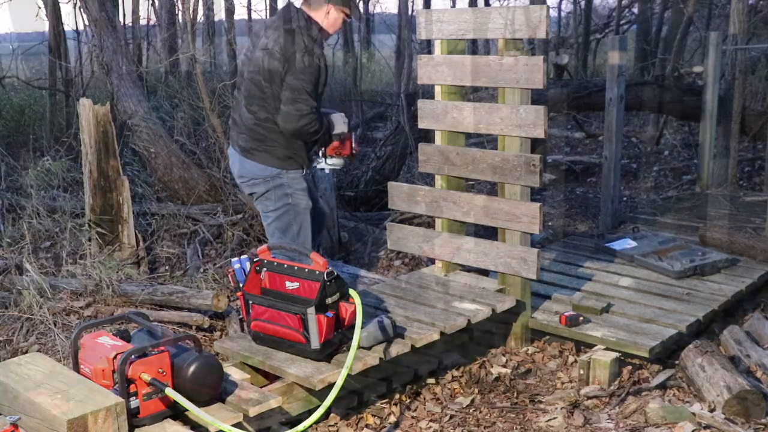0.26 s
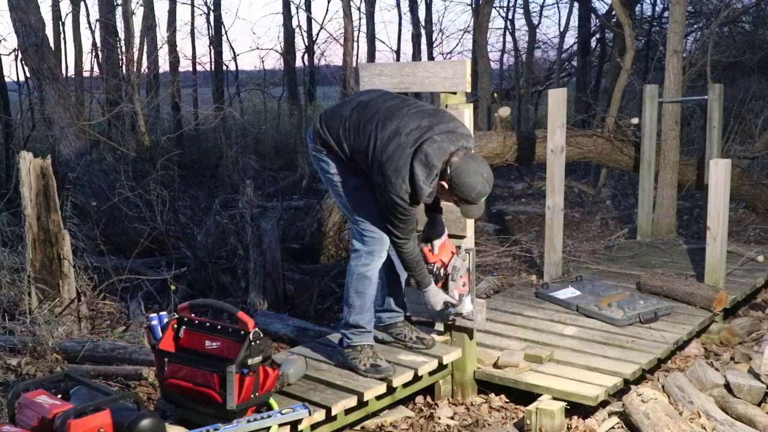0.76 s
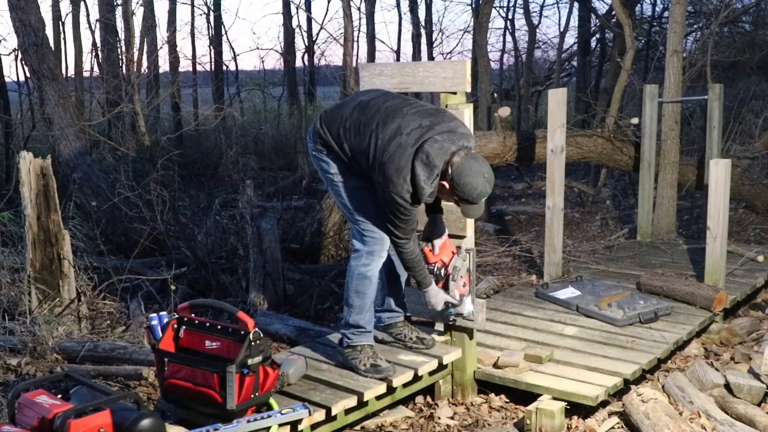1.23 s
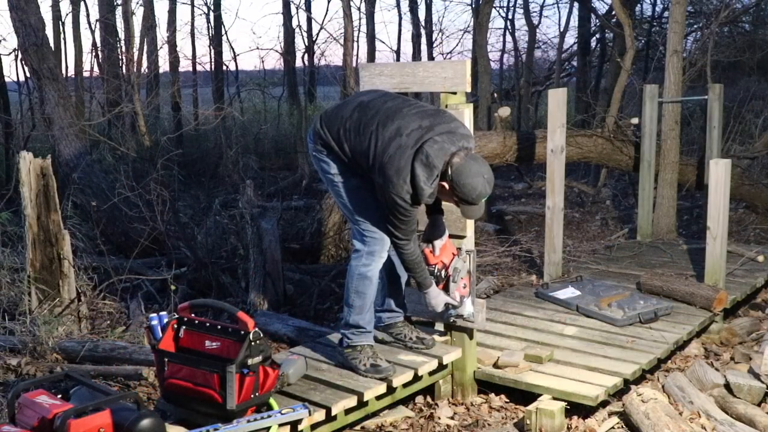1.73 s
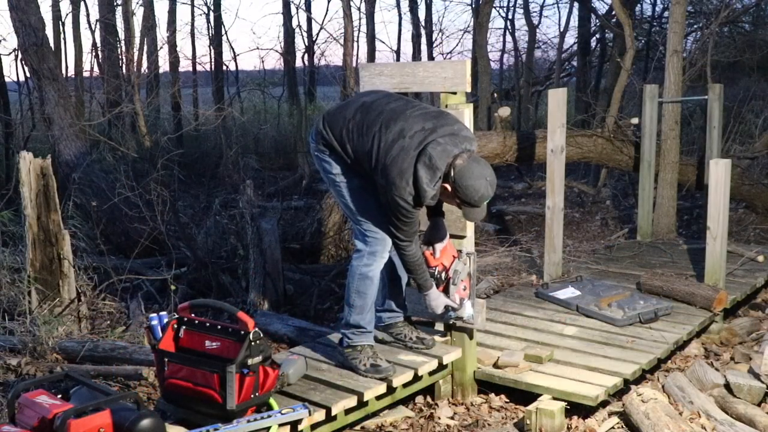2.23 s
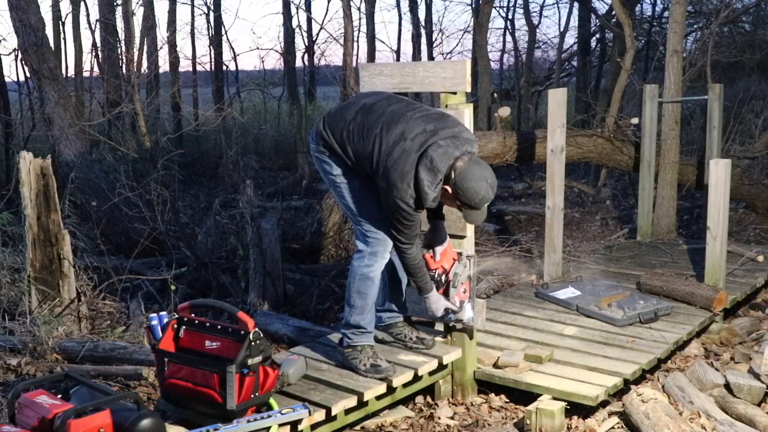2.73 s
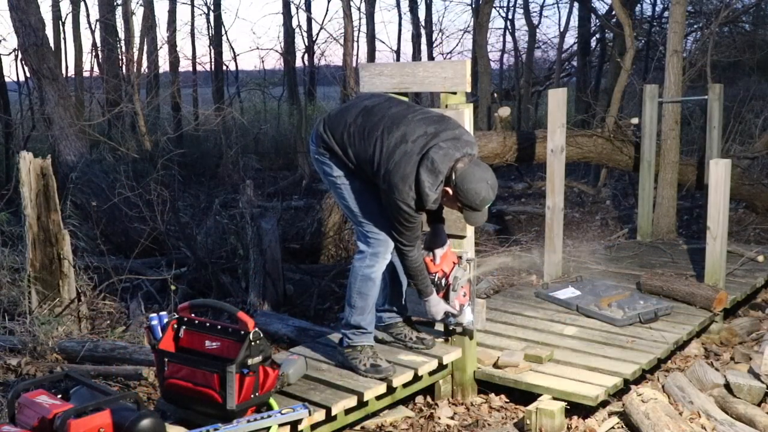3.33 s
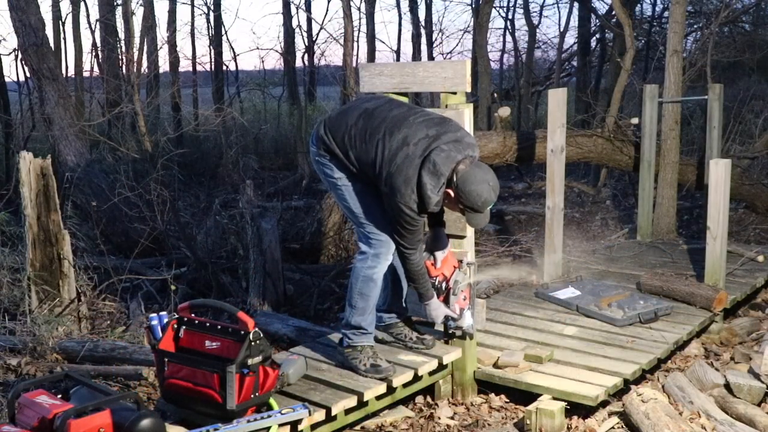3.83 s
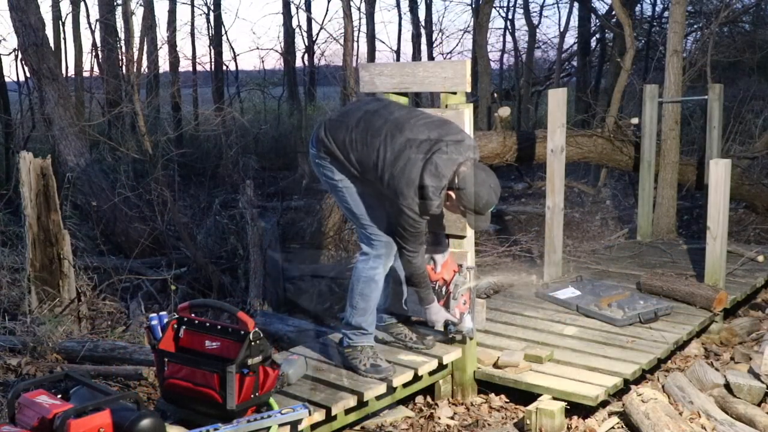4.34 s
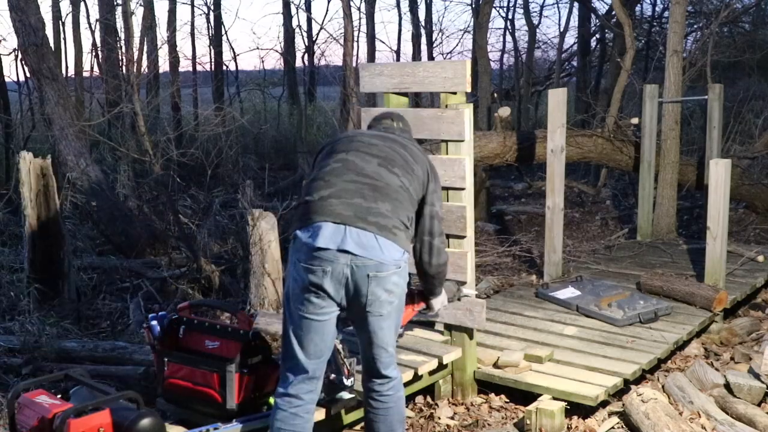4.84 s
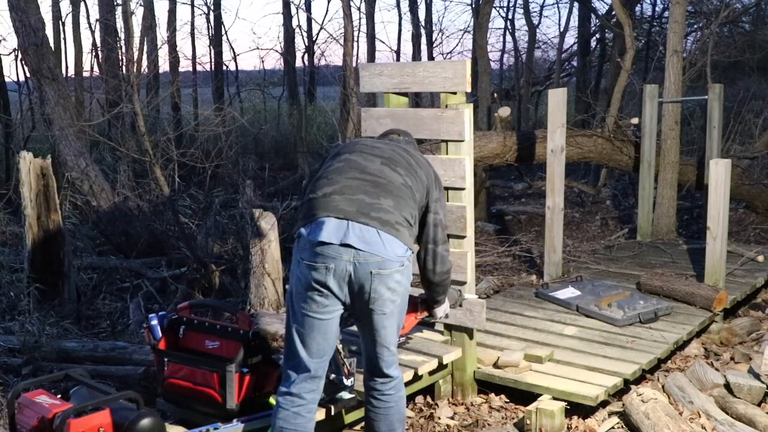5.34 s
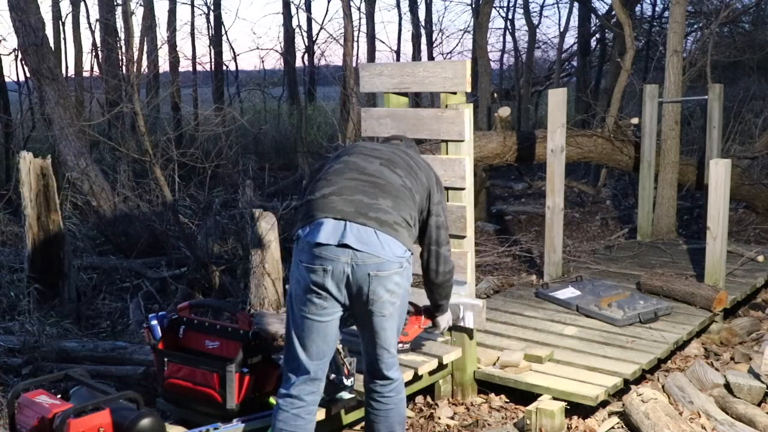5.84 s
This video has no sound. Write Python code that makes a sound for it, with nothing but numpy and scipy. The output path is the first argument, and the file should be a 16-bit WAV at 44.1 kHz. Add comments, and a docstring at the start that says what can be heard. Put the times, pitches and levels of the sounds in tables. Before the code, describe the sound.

Outdoors among trees, nearly quiet at first: soft air and a very faint, glassy ring of a free steel blade, with a tiny tick at 0.2 s. From 0.3 to 0.8 s a circular saw fades in, a steady whine near 2.3 kHz over rushing fan air. At 1.7 s the teeth bite wood: bright, gritty rasp bursts in, squeals swell around 1.9-2.6 s, and the whine dims and sags slightly. Rasp surges with pushes until 4.4 s, the whine partly returning. By 4.7 s it has faded into stronger breeze and leaf rustle, with dry snaps and ticks. Wooden knocks come at 5.1 and 5.3 s, a faint rattle at 5.6. At 5.7 s a sharp crack starts a reciprocating saw: quick rising whine, chirp, clustered hollow blows; at 5.9 s the blade catches, shaking and chattering rapidly to the end. A short thin echo surrounds it.

```python
"""A free steel blade rings faintly outdoors, then a circular saw fades in, bites a board and slows under load.
The sound fades over to a breezier moment: a reciprocating saw knocks on wood, starts with a crack and chatters.
Circular saw: shaft-locked tones, fan noise and a tooth pattern that repeats every turn; squeals are swelling tones.
Reciprocating saw: rising gear whine, pulsed scrape and shake; its knocks are blows and rattles ringing the wood.
Breeze and leaves are shaped noise, snaps are one-cycle clicks; a thin echo follows the second saw and the snaps."""
import sys
import numpy as np
from scipy import signal
from scipy.fft import rfft, irfft
from scipy.io import wavfile
from scipy.ndimage import uniform_filter1d, map_coordinates

SR = 44100
rng = np.random.default_rng(int(sys.argv[2]) if len(sys.argv) > 2 else 0)


def output_pcm(signal):
    """Save a mono or channel-first signal as 16-bit PCM at the path in sys.argv[1].

    Samples are clipped to [-1, 1] before scaling.
    """
    pcm = np.clip(np.atleast_2d(signal).T, -1, 1) * 32767
    wavfile.write(sys.argv[1], SR, np.round(pcm).astype(np.int16))


N = 268657
T = np.arange(N) / SR
HZ = np.fft.rfftfreq(N, 1 / SR)

# circular saw
GEAR_TEETH, BLADE_TEETH = 25, 24
CONTACT_S = 1.7  # teeth meet the wood
RASP_RISE_S, CHIP_RISE_S, SINK_S = 0.12, 0.035, 0.18
# reciprocating saw: motor start, blade catches in the wood
TRIGGER_S, CATCH_S = 5.692, 5.916


def amp(db):
    """Decibels to gain."""
    return 10 ** (np.asarray(db) / 20)


def unit(x):
    """Scales to rms 1."""
    return x / np.sqrt(np.mean(x ** 2) + 1e-20)


def curves(rows):
    """Interpolates the columns of a (time [s], value...) table to every sample."""
    time_s, *columns = np.transpose(rows)
    return [np.interp(T, time_s, column) for column in columns]


def ramp(start_s, length_s):
    """Linear rise from 0 to 1, then held."""
    return np.clip((T - start_s) / length_s, 0, 1)


def swell(peak_s, length_s):
    """Cosine-squared bump of height 1."""
    return np.cos(np.pi * np.clip((T - peak_s) / length_s, -0.5, 0.5)) ** 2


def shape(points):
    """Gain at every frequency from a (frequency [Hz], level [dB]) spectrum, linear in log frequency."""
    hz, db = np.transpose(points)
    return amp(np.interp(np.log(HZ + 1), np.log(hz), db))


def resonances(modes):
    """Complex response of each damped resonance (frequency [Hz], width [Hz], level [dB])."""
    return np.array([amp(db) / (1 + 2j * (HZ - hz) / width_hz) for hz, width_hz, db in modes])


def lift(modes):
    """Gain of resonances standing out of a flat background, summed in power."""
    power = (abs(resonances(modes)) ** 2).sum(0)
    return np.sqrt(1 + power)


def colour(x, gain, band=(0, np.inf)):
    """Filters x and scales it to rms 1 inside the band [Hz]."""
    z = rfft(x) * gain
    inside = z[(HZ >= band[0]) & (HZ <= band[1])]
    return irfft(z, N) * N / np.sqrt(2 * np.sum(abs(inside) ** 2) + 1e-20)


def noise():
    """White noise."""
    return rng.standard_normal(N)


def drift(hz):
    """Random drift of rms 1, up to about hz."""
    return colour(noise(), np.exp(-(HZ / hz) ** 2))


def blotches(x, depth_db, size=512, order=5):
    """Random narrow spectral regions swell and sink for a few hundredths of a second."""
    z = signal.stft(x, nperseg=size)[2]
    field = rng.standard_normal(z.shape)
    field = uniform_filter1d(uniform_filter1d(field, order, 0), order, 1)
    return unit(signal.istft(z * amp(depth_db * unit(field)), nperseg=size)[1][:N])


def fades():
    """Gains of the circular saw and of the second moment."""
    fade_in_s, fade_over_s = (0.3, 0.77), (4.408, 4.739)  # (from, to)
    power = 1.47
    come, go = (ramp(a, b - a) for a, b in (fade_in_s, fade_over_s))
    return (come * (1 - go)) ** power, go ** power


def open_air():
    """Breeze rumble and crisp leaf rustle as shaped noise, both raised in the second moment."""
    # (frequency [Hz], relative level [dB])
    rumble_spectrum = [(15, -41), (30, -15), (72, 2.5), (110, -7.5), (180, -9), (340, -11), (550, -20.5),
                       (1200, -55)]
    rustle_spectrum = [(250, -14), (500, -7), (1000, -6), (1800, -13), (3000, -13), (3900, -9.5),
                       (4800, -19), (9000, -22), (15800, -26)]
    breeze_db, leaves_db = (-51, -38.5), (-57.5, -48)  # (first moment, second moment)
    duck_db = -13  # level of the low rumble drops once a saw is at work
    later = fades()[1]
    first, second = (amp(db + duck_db * ramp(start_s, SINK_S))
                     for db, start_s in zip(breeze_db, (CONTACT_S, TRIGGER_S)))
    breeze_gain = (first * (1 - later) + second * later) * amp(2.0 * drift(4.4))
    rumble = breeze_gain * colour(noise(), shape(rumble_spectrum))
    leaves_gain = amp(leaves_db[0]) * (1 - later) + amp(leaves_db[1]) * later
    rustle = colour(noise() * amp(1.5 * drift(220)), shape(rustle_spectrum))
    return rumble + leaves_gain * rustle


def snaps(count=6):
    """Dry snaps of twigs, leaves and splinters, plus random ticks: damped clicks of about one cycle."""
    # (time [s], level before decay [dB], pitch [Hz])
    dry_snaps = [(.212, -34, 8000), (4.619, -17, 800), (4.757, -29, 8000), (4.98, -25, 11000),
                 (5.154, -20, 10000), (5.2935, -17, 13500)]
    # faint random ticks of crackling leaves
    tick_span_s, tick_db, tick_spread_db, tick_hz = (4.78, 5.2), -29, 2, 11000
    ticks = [(rng.uniform(*tick_span_s), tick_db + tick_spread_db * rng.standard_normal(), tick_hz)
             for _ in range(count)]
    out = np.zeros(N)
    for time_s, db, hz in [*dry_snaps, *ticks]:
        cycles = np.clip((T - time_s) * hz, 0, 20)
        out += amp(db) * np.sin(2 * np.pi * cycles) * np.exp(-cycles / 0.83)
    return out


def trees(x, t60_s=0.29, wet_db=-15):
    """Trunks and boards scatter a short, thin echo: sparse decaying impulses."""
    t = T[:SR // 2]
    sparse = rng.standard_normal(len(t)) * (rng.random(len(t)) < 0.05)
    tail = sparse * amp(-60 * t / t60_s) * (t > 0.008)
    return x + amp(wet_db) * signal.fftconvolve(x, tail / np.linalg.norm(tail))[:N]


def chatter():
    """The caught blade knocks once a stroke, with uneven strength."""
    stroke_hz = 48.6
    thud_db, crack_db, decay_s, spread_db = -20.5, -18, 0.0065, 4.5
    times_s = np.arange(CATCH_S + 1 / stroke_hz, T[-1], 1 / stroke_hz)
    chance_db = spread_db * rng.standard_normal((len(times_s), 2))
    return [(s, thud_db + a, crack_db + b, decay_s) for s, (a, b) in zip(times_s, chance_db)]


def knocks():
    """Blows and short rattles ring the wood, with a hard crack of steel on top."""
    # tool against wood: (time [s], thud [dB], crack [dB], rattle decay constant [s])
    contacts = [(5.118, -33, -48, 0.025), (5.2932, -26.5, -25, 0.0092), (5.298, -24, -51, 0.013),
                (5.308, -24, -49, .006), (5.579, -34.5, -38.5, 0.05), (5.6921, -17, -7, 0.0047),
                (5.724, -19.5, -16, .012), (5.739, -11, -17, 0.0056), (5.748, -7.5, -13, 0.0057),
                (5.78, -8, -13, 0.0058), (5.829, -22, -20, .008), (5.915, -11.5, -12.5, 0.01)]
    # ringing of tool and boards: (frequency [Hz], width [Hz], relative level [dB])
    wood = [(321, 16, 2.5), (566, 40, -6.5), (1056, 14, 9.5), (1146, 20, 6.5), (1209, 61, 11),
            (1760, 85, 3), (1970, 53, -20), (2789, 32, -12)]
    # (frequency [Hz], relative level [dB])
    crack_spectrum = [(300, -25), (1500, 2), (2200, 6), (3900, 6), (4700, -14), (8000, -14.5), (15800, -21)]
    blow_db = 14  # first impulse, re rattle gain
    blows, rattle, crack = np.zeros((3, N))
    for time_s, thud_db, crack_db, decay_s in [*contacts, *chatter()]:
        fall = np.exp(-np.maximum(T - time_s, 0) / decay_s) * (T >= time_s)
        blows[round(time_s * SR)] += amp(thud_db + blow_db)
        rattle += amp(thud_db) * fall
        crack += amp(crack_db) * fall
    t = T[:SR // 4]
    ring = sum(amp(db) * width_hz * np.exp(-np.pi * width_hz * t) * np.sin(2 * np.pi * hz * t)
               for hz, width_hz, db in wood)
    thud = signal.fftconvolve(blows + rattle * noise(), ring / np.linalg.norm(ring))[:N]
    return thud + crack * colour(noise(), shape(crack_spectrum))


def reciprocating_saw():
    """The motor winds up; the blade scrapes in pulses and, once it catches, shakes the boards."""
    # (frequency [Hz], relative level [dB])
    scrape_spectrum = [(200, -8), (550, -2), (1000, 2.5), (1500, 6.5), (2200, -0.5), (2900, 1.5), (3800, 5),
                       (4650, -14), (6000, -8.5), (13400, -16.5), (15800, -18)]
    shake_spectrum = [(20, -55), (50, -26), (85, -14), (120, 12), (170, -1), (380, 8.5), (600, 0),
                      (1200, 9.5), (3000, -62)]
    # blade resonances: (frequency [Hz], width [Hz], level [dB])
    blade_modes = [(1030, 42, 9), (1810, 58, -6), (2570, 50, 3), (3250, 59, 3)]
    start_hz, top_hz, wind_up_s = 1090, 2140, 0.075  # gear whine
    # at full speed: (running free [dB], change once caught [dB]) of whine, scrape, shake
    levels = (-24.5, -8.5), (-22, -5.5), (-36, 15)
    speed_slope_db = 16  # per unit of speed / full speed
    whine_hz = top_hz - (top_hz - start_hz) * np.exp(-np.maximum(T - TRIGGER_S, 0) / wind_up_s)
    speed_db = speed_slope_db * (whine_hz / top_hz - 1)
    caught = ramp(CATCH_S, 0.0077)
    whine_db, scrape_db, shake_db = (free + speed_db + change * caught for free, change in levels)
    mesh_cycles = np.cumsum(whine_hz) / SR
    # one pulse per 23 mesh cycles, about two per stroke
    pulses = amp(1.0 * np.cos(2 * np.pi * mesh_cycles / 23) + 0.87 * drift(400))
    scrape_gain = shape(scrape_spectrum) * lift(blade_modes)
    scrape = amp(scrape_db) * colour(noise() * pulses, scrape_gain, band=(2400, 9000))
    shake = amp(shake_db) * colour(noise() * pulses, shape(shake_spectrum))
    whine = np.sqrt(2) * amp(whine_db) * np.sin(2 * np.pi * mesh_cycles + 0.32 * drift(120))
    return (scrape + shake + whine) * ramp(TRIGGER_S, 0.008)


def ringing_blade():
    """The free steel disc rings softly in its modes until the running saw takes over."""
    # free blade: (frequency [Hz], mean level [dB])
    free_modes = [(1437, -58), (1836, -66), (2051, -55), (3257, -55.5), (3354, -62), (4274, -73)]
    ring = sum(amp(db + 2.1 * drift(15)) * np.sin(2 * np.pi * (hz * T + rng.random()))
               for hz, db in free_modes)
    return np.sqrt(2) * ring * np.clip((0.65 - T) / 0.18, 0, 1)


def squeals_and_chirp():
    """Tones swell, a little rough: circular blade squeals, the second motor's starting chirp, a later squeal."""
    # (time of peak [s], length [s], frequency [Hz], rms level at peak [dB])
    squeal_tones = [(1.916, 0.57, 3760, -27.5), (2.111, 0.17, 3750, -18), (2.1, .29, 5451, -30.5),
                    (2.566, 0.15, 4140, -24.5), (2.58, 0.14, 3890, -25), (5.729, 0.025, 2070, -13.5),
                    (5.983, 0.19, 2550, -27)]
    waver_rad = 0.25 * drift(29.4) + 0.12 * drift(400)
    return np.sqrt(2) * sum(amp(db) * swell(peak_s, length_s) * np.sin(2 * np.pi * hz * T + waver_rad)
                            for peak_s, length_s, hz, db in squeal_tones)


def pushed():
    """Gain in dB of rasp and chips as the hand pushes the saw on."""
    # (time of peak [s], length [s], added rasp [dB], added chips [dB])
    pushes = [(1.823, 0.64, 6, 1.5), (2.173, .42, 3.5, 3.5), (2.375, 0.13, 4.5, -0.5), (2.61, 0.32, 4.5, 4),
              (2.803, 0.23, 2.5, 3.5), (3.228, 0.44, 2, 4), (3.7, 0.21, 2.5, 2), (4.12, 0.56, 5, 0),
              (4.37, 0.21, 5, -1.5)]
    return sum(np.outer(more_db, swell(peak_s, length_s)) for peak_s, length_s, *more_db in pushes)


def tooth_pattern(turns, size=512, count=4):
    """The rasp of one turn, repeated; it changes slowly as the teeth meet new grain."""
    position = turns % 1 * size
    patterns = (map_coordinates(rng.standard_normal(size), [position], order=3, mode="grid-wrap")
                for _ in range(count))
    weights = np.array([drift(4.6) for _ in range(count)])
    weights = weights / np.linalg.norm(weights, axis=0)
    return unit(sum(w * p for w, p in zip(weights, patterns)))


def running_saw(turns, whine_db):
    """Gear mesh, whistling teeth and motor tones over the air the fan drives through the housing."""
    # gear and motor side tones: (multiple of blade turning rate, mean level re fan air [dB])
    orders = [(3.125, -13), (6, -12), (9.375, -14), (11.5, -12), (12.5, -10), (15.625, -14), (20.875, -13),
              (21.875, -4), (26, -10), (28.46, -9), (30.29, -9), (49, -13), (55, -16), (143.75, -13)]
    # (frequency [Hz], relative level [dB])
    fan_spectrum = [(150, -17), (240, -14), (330, -4), (560, 0.5), (800, 1.5), (1500, 2), (2900, 2.5),
                    (3900, -0.5), (4750, -6), (7800, 3), (10000, -7.5), (12500, -16.5), (15800, -13.5)]
    # air resonances: (frequency [Hz], width [Hz], level [dB])
    housing = [(1128, 133, 7), (2160, 180, 6.5), (2610, 106, 7.5), (3645, 180, 9)]
    fan_db, muffled_db = -36, -8.5  # muffled as the blade sinks in
    air_db = fan_db + muffled_db * ramp(CONTACT_S + CHIP_RISE_S, SINK_S)
    mesh = amp(whine_db + 0.5 * drift(27)) * np.sin(2 * np.pi * GEAR_TEETH * turns)
    whistle = amp(whine_db - 15.5 + 3 * drift(7)) * np.sin(2 * np.pi * BLADE_TEETH * turns)
    tones = sum(amp(db + 3.2 * drift(9.5)) * np.sin(2 * np.pi * (order * turns + rng.random()))
                for order, db in orders)
    gusts = noise() * amp(0.88 * drift(170))
    air = colour(gusts, shape(fan_spectrum) * lift(housing), band=(350, 850))
    return np.sqrt(2) * (mesh + whistle) + amp(air_db) * (air + np.sqrt(2) * tones)


def cut(turns):
    """Each tooth tears the wood in its own way, so much of the rasp repeats with every turn."""
    # (frequency [Hz], relative level [dB])
    rasp_spectrum = [(150, -27.5), (250, -25.5), (450, -26), (750, -14), (1100, -7), (1500, -6),
                     (2300, -0.5), (2900, 1), (3900, 1), (4700, -5.5), (6500, -5), (9000, -3.5),
                     (13500, -5.5), (15800, -9.5)]
    # blade and board in the cut: (frequency [Hz], width [Hz], level [dB])
    plate = [(945, 50, 8), (1090, 50, 2), (2515, 22, 9), (2615, 26, 9.5), (3390, 40, 0), (3757, 25, 8),
             (3886, 20, 5), (4140, 30, 5), (4524, 20, 4), (5451, 20, 4), (6145, 30, 4), (8299, 35, 6)]
    rasp_base_db, chips_base_db = -27.5, -27.5
    hum_db, hum_rise_db_per_s, full_depth_s = -31.5, 2.5, 3.9  # peak hum re rasp level
    rasp_db, chips_db = pushed() + [[rasp_base_db], [chips_base_db]]
    bite = 1 + 0.3 * np.cos(2 * np.pi * BLADE_TEETH * turns)
    splinters = 0.65 * unit(noise() * amp(4 * drift(1500)))
    # contact shifts in the kerf, so the colour keeps changing
    torn = blotches(tooth_pattern(turns) + splinters, depth_db=2.0)
    tearing = bite * torn * amp(0.63 * drift(50))
    gain = shape(rasp_spectrum) * lift(plate)
    treble = 1 / (1 + (5500 / (HZ + 1)) ** 4)
    rasp = amp(rasp_db) * colour(tearing, gain * (1 - treble), band=(2400, 4500))
    chips = amp(chips_db + 0.52 * drift(43)) * colour(tearing, gain * treble, band=(9500, 15500))
    # slightly warped blade pushes the board twice a turn, harder as it sinks in
    depth_db = -hum_rise_db_per_s * np.maximum(full_depth_s - T, 0)
    hum = amp(rasp_db + hum_db + depth_db + 2 * drift(5)) * np.sin(4 * np.pi * turns)
    return (rasp + hum) * ramp(CONTACT_S, RASP_RISE_S) + chips * ramp(CONTACT_S, CHIP_RISE_S)


def circular_saw():
    """One shaft drives the whine and the teeth; load slows it and dims the whine."""
    # gear whine under load: (time [s], frequency [Hz])
    sag = [(1.78, 2260), (2.34, 2203), (2.56, 2198), (2.77, 2161), (2.87, 2162), (2.92, 2178), (3.2, 2147),
           (3.58, 2114), (4.1, 2139), (4.32, 2097), (4.5, 2119)]
    free_hz = 2270
    # the whine dims as the blade enters, comes back as it works through
    free_db, dip_db, back_db, back_from_s, back_s = -19, -5, 3, 2.73, 0.96
    whine_per_chips_db = -0.43  # per dB of added chips
    whine_hz, = curves([(CONTACT_S, free_hz), *sag])
    dip = dip_db * ramp(CONTACT_S + RASP_RISE_S, SINK_S)
    back = back_db * ramp(back_from_s, back_s)
    whine_db = free_db + dip + back + whine_per_chips_db * pushed()[1]
    turns = np.cumsum(whine_hz / GEAR_TEETH * (1 + 0.00048 * drift(17.5))) / SR
    return (running_saw(turns, whine_db) + cut(turns)) * fades()[0]


def scene():
    """Both saws in the open air."""
    echoing = trees(knocks() + snaps() + reciprocating_saw())
    return (ringing_blade() + circular_saw() + squeals_and_chirp() + echoing + open_air())[None]


def record(dry):
    """Microphone low cut, soft ceiling on the loudest peaks and an upper band limit."""
    ceiling, edge_hz = 0.85, 15850
    thinned = signal.lfilter(*signal.butter(2, 32, "highpass", fs=SR), dry)
    rounded = thinned / (1 + (thinned / ceiling) ** 8) ** (1 / 8)
    lowpass = signal.firwin(511, edge_hz, window=("kaiser", 9), fs=SR)
    return signal.oaconvolve(rounded, lowpass[None], "same")


dry = scene()
out = record(dry)
output_pcm(out)
```